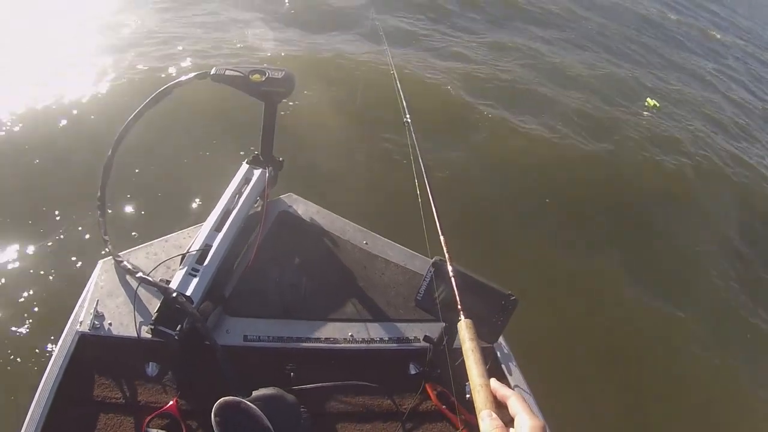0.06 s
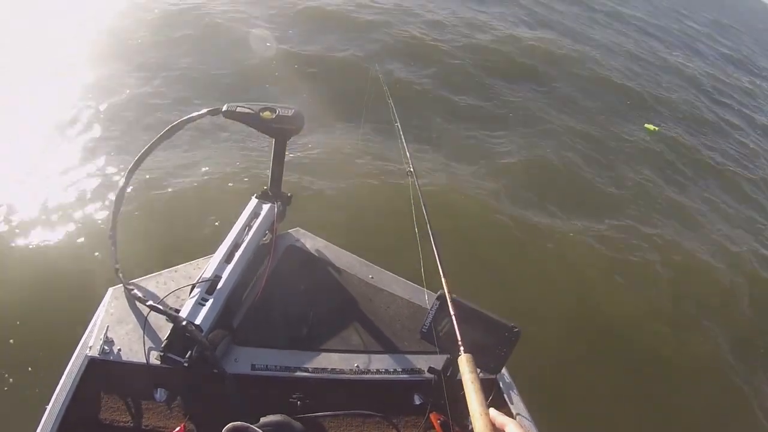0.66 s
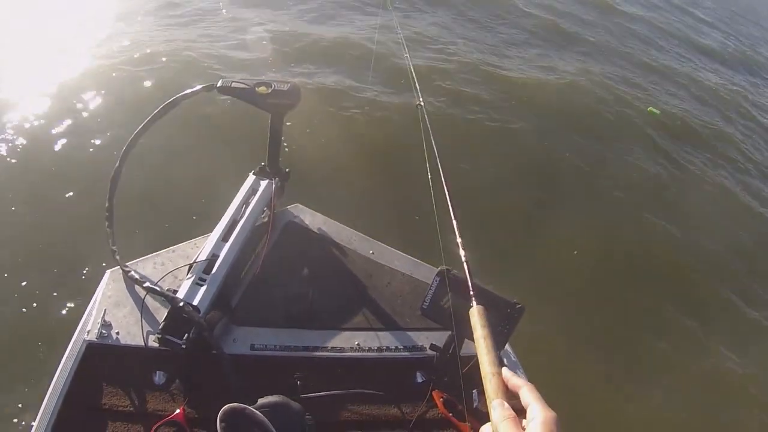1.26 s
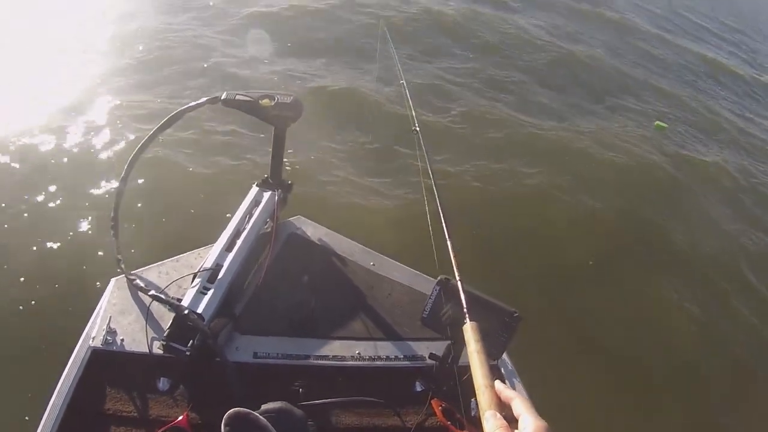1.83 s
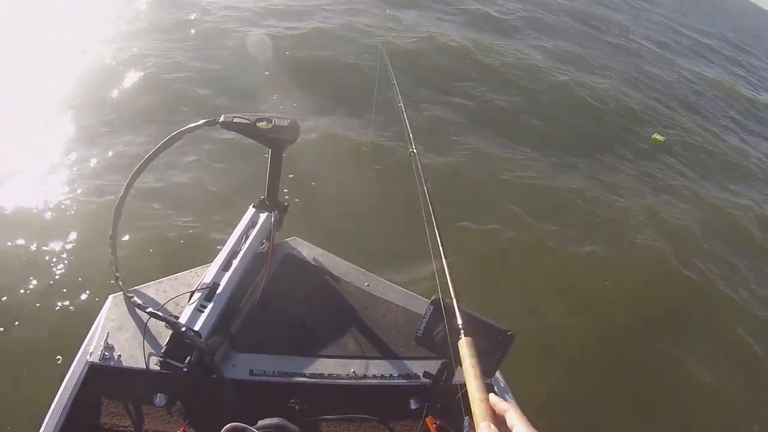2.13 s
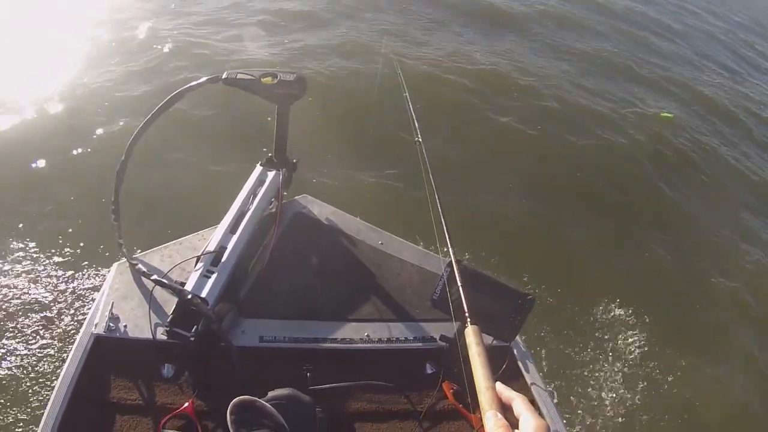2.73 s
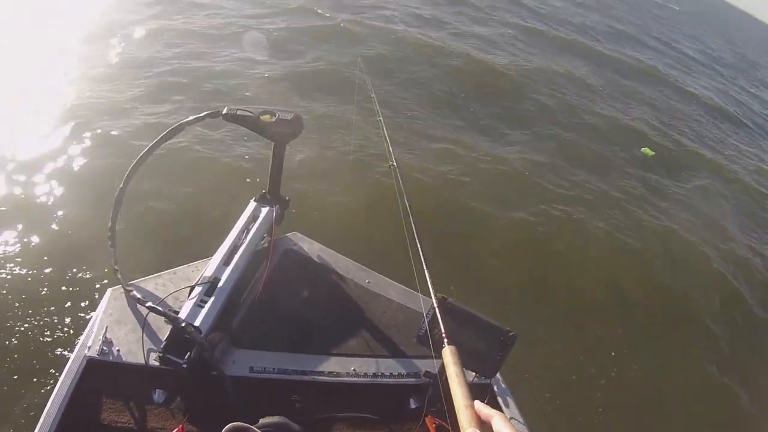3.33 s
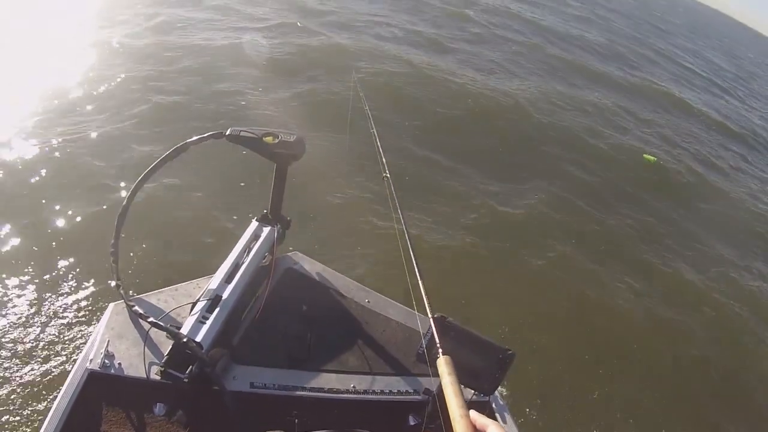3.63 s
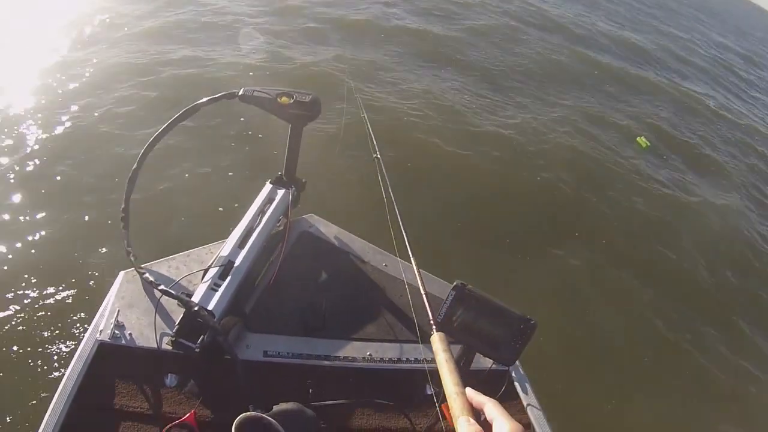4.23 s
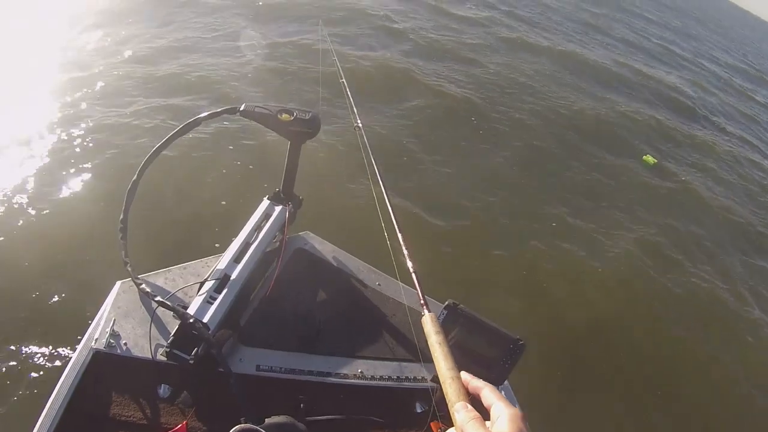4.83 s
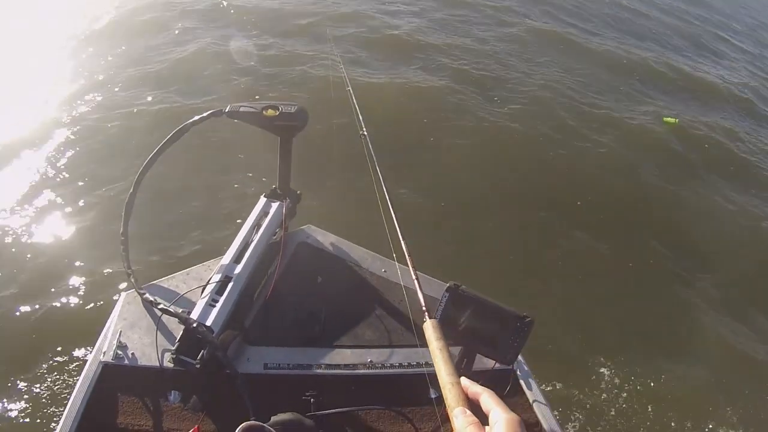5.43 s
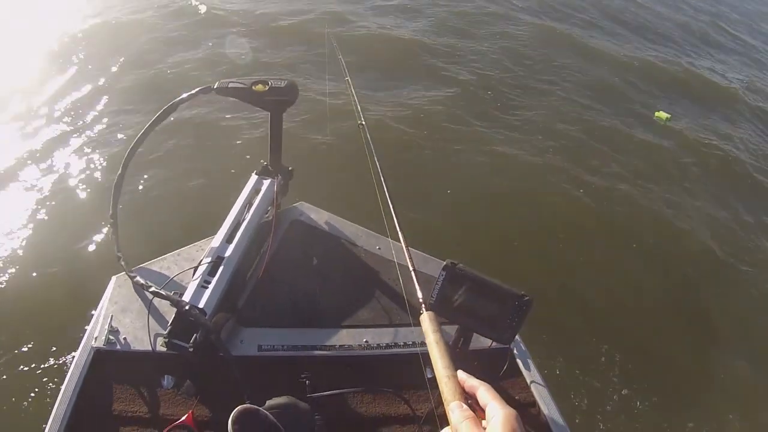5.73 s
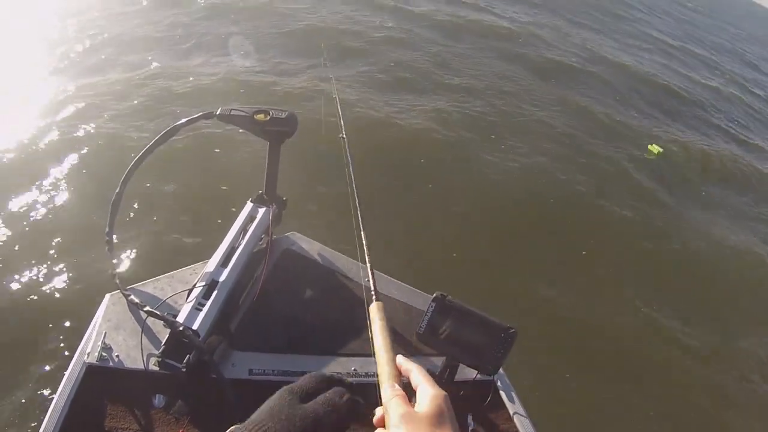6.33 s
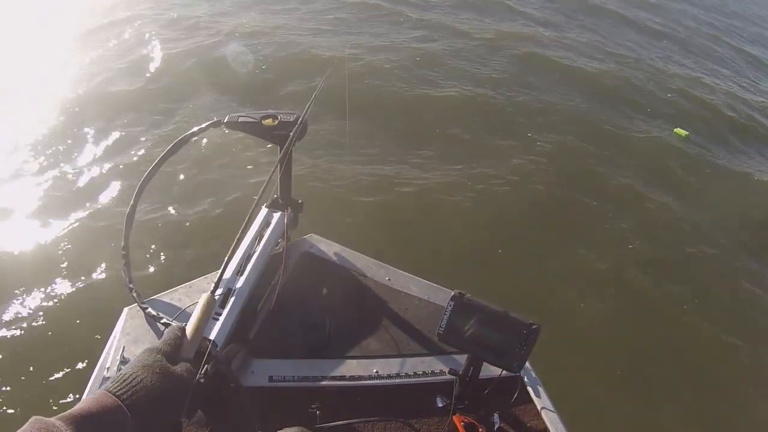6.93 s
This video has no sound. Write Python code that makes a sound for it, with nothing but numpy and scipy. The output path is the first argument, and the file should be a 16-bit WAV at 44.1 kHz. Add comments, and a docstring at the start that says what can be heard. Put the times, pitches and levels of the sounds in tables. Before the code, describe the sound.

Uneven, low wind buffets a body-worn microphone throughout, over a soft wash of ripples on an open lake. Water plops close by against a small boat's bow, with a brief gurgle near 0.9 seconds. At about 2.1 seconds a wave hits with a sharp slap, dull hull thumps and bubbling, and bright spray spatters back until about 3 seconds. Another wave thumps and gurgles at 3.2 seconds, breaking into a longer splash around 3.5 that trickles off in droplets and faint fizzing foam. At 4.8 seconds fishing tackle gives one hard clack. A third wave gurgles right after, with a splash and a low thump around 5.3 seconds. Smaller plops and dashes of water follow near 5.9, 6.2 and 6.7 seconds, while the wind blows a little harder, in short puffs, up to the end at about 7 seconds.

```python
"""Small fishing boat on a choppy lake

Waves hit the bow: trapped air slaps and gurgles, crests splash, spray rains back and water trickles off.
Between them ripples lap and plop, drops spatter, and the fishing tackle clacks once.
Most of the water sound is ringing bubbles and drops: big ones sound low, small ones high.
Swirls of wind buffet the microphone of a body-worn camera, whose housing colours everything."""
import sys
import numpy as np
from scipy import signal
from scipy.fft import rfft, irfft
from scipy.io import wavfile
from scipy.ndimage import uniform_filter1d

SR = 44100
rng = np.random.default_rng(int(sys.argv[2]) if len(sys.argv) > 2 else 0)


def inscribe(sig):
    """Save sig as 16-bit PCM at rate SR to the path in sys.argv[1].

    A 1-D sig is mono; a 2-D sig holds one channel per row.
    Samples are clipped to [-1, 1] before scaling.
    """
    pcm = np.round(np.clip(np.atleast_2d(sig).T, -1, 1) * 32767)
    wavfile.write(sys.argv[1], SR, pcm.astype(np.int16))


N = 316197

# Waves hitting the bow. Each row: time of full strength in seconds, level in dB,
# hold and fade in seconds, extra spray in dB.
WAVE_HITS = [(0.805, -52, 0.11, 0.042, -0.5), (2.135, -40.5, 0.1, 0.13, 3.5),
             (3.173, -40, 0.055, 0.34, 1.5), (4.894, -41.5, 0.062, 0.71, -2.5)]
# Crests falling back on the lake. Each row: time of full strength in seconds, level in dB,
# rise, hold and fade in seconds, extra spray in dB.
CRESTS = [(2.38, -49.5, 0.099, 0.24, 0.16, 7.3), (2.682, -50, 0.08, 0.11, 0.18, 9),
          (3.448, -43.5, 0.26, 0.12, 0.54, -1), (5.237, -43, 0.24, 0.085, 0.2, 0),
          (6.133, -61.5, 0.23, 0.18, 0.084, -2.5), (6.613, -55.5, 0.37, .06, 0.38, -4)]
# The balance of a hit, a crest and its foam. Each lists gurgle, splash, spray and mist in dB.
HIT_MIX = [-1, -9, -19, -26.5]
CREST_MIX = [-4, 0.5, -7, -13.5]
FOAM_MIX = [-44, -37, -24, -26.5]
# Bubbles and drops, from biggest to finest. Each row: pitch in Hz, level in dB.
GURGLE_PITCHES = [(500, -20), (750, -7), (1100, -2.5), (1400, -6.5), (1800, -8.5)]
SPLASH_PITCHES = [(1500, -2), (2300, -3.5), (3600, -5.5), (4800, -12)]
SPRAY_PITCHES = [(5000, -5.5), (5900, -6), (7600, -5), (8800, -11.5)]
MIST_PITCHES = [(9000, 4), (11700, 4), (13200, -19), (14500, -14)]

def waves():
    """Waves fold in large bubbles, break into small ones, throw spray and mist, and leave foam."""
    surges = []
    for s, db, hold_s, fade_s, spray_db in WAVE_HITS:
        surges.append(surge(HIT_MIX, s, db, 0.062, hold_s, fade_s, spray_db))   # a quick rise
    for s, db, rise_s, hold_s, fade_s, spray_db in CRESTS:
        surges.append(surge(CREST_MIX, s, db, rise_s, hold_s, fade_s, spray_db))
        surges.append(surge(FOAM_MIX, s, db, rise_s, hold_s, fade_s=2.8, spray_db=0))
    gurgle, splash, spray, mist = np.sqrt(sum(gains ** 2 for gains in surges))   # their energies add
    large = bubbles(GURGLE_PITCHES, per_s=750, cycles=11, spread_db=2.6, clump_db=1.5, pitches=24)
    small = bubbles(SPLASH_PITCHES, per_s=3600, cycles=11, spread_db=2.4, clump_db=1.3, pitches=20)
    drops = bubbles(SPRAY_PITCHES, per_s=3600, cycles=10, spread_db=2.6, clump_db=1.4, pitches=14)
    droplets = bubbles(MIST_PITCHES, per_s=4400, cycles=4.4, spread_db=2.5, clump_db=2.0, pitches=12)
    sheets = from_db(0.9 * drift(14))   # spray lands in sheets
    return gurgle * large + splash * small + sheets * (spray * drops + mist * droplets)


# How long each part of a wave lingers: the share of the fade time for gurgle, splash, spray and mist.
FADE_SHARES = [0.57, 0.91, 0.66, 0.65]

def surge(mix, s, db, rise_s, hold_s, fade_s, spray_db):
    """One rush of water, as four loudness curves: gurgle, splash, spray and mist."""
    extras_db = [0, 0, spray_db, 0.52 * spray_db]   # more spray brings more mist
    return np.array([from_db(db + part_db + extra_db) * swell(s, rise_s, hold_s, fade_s * share)
                     for part_db, extra_db, share in zip(mix, extras_db, FADE_SHARES)])


# Air pockets closing at the hull. Each row: start in seconds, level in dB, pitch in Hz,
# ring time in seconds, level of the churn around it in dB relative to the plop.
PLOPS = [(.48, -46, 1300, .05, -2), (.518, -41, 770, .05, 3), (.549, -44, 1000, .05, 6),
         (.59, -48.5, 2710, .06, 9), (.816, -42, 1390, .07, 2), (.845, -50, 2130, .06, -6),
         (.863, -30.5, 950, 0.049, -14), (.878, -37, 857, 0.052, -4), (0.902, -41.5, 1470, 0.064, 3),
         (1.271, -40, 1800, 0.042, 1), (1.759, -41, 1300, 0.054, -4), (2.147, -28, 1020, 0.063, -8),
         (2.174, -39, 1730, .04, 4), (2.187, -33, 1440, .025, -3), (2.208, -29.5, 1106, .05, 3.5),
         (2.221, -34.5, 1300, 0.045, 3), (2.236, -42, 1480, .05, 5), (2.256, -40, 1250, 0.094, -6),
         (2.328, -39.5, 1350, .04, 5), (2.357, -37.5, 2020, .05, 7), (2.535, -42.5, 1390, .06, -5),
         (3.019, -43, 1230, .05, 5), (3.168, -40, 1520, .04, -4), (3.18, -36.5, 820, 0.046, 4),
         (3.2, -38.5, 1530, .03, 6), (3.22, -35, 1090, .04, 1), (3.292, -41, 1280, 0.077, 9),
         (3.478, -35.5, 1260, 0.078, -11), (3.568, -37, 760, .07, 10.5), (3.623, -38, 1100, .04, -1.5),
         (3.696, -38, 1140, .09, 4), (3.726, -45, 2330, .05, -3), (3.802, -42, 1290, .05, 5.5),
         (3.843, -46, 1510, 0.044, 1), (4.004, -44.5, 1090, .04, 5), (4.824, -39, 1660, .05, -3),
         (4.917, -35, 1250, .05, 6), (4.94, -35, 1130, .06, 5), (5.378, -35, 1760, 0.037, -4),
         (5.877, -30.5, 1500, 0.02, -2), (5.926, -39.5, 1200, 0.053, 7), (5.964, -43, 1950, 0.074, -8),
         (5.994, -32.5, 847, .06, -3), (6.019, -42, 835, .05, -6), (6.223, -36, 986, 0.061, -4),
         (6.678, -35.5, 1232, 0.07, 1)]

def plops():
    """Single pockets of air ring as the water churns shut over them."""
    out = np.zeros(N)
    for s, db, hz, ring_s, churn_db in PLOPS:
        add(out, s, from_db(db) * air_pocket(hz, ring_s, swell_s=0.00074, glide=-0.035))
        add(out, s, from_db(db + churn_db) * churn(hz))
    return out


def churn(hz):
    """Water closing over an air pocket tears off a quick run of six smaller and larger bubbles."""
    span_s, span_octaves, cycles = 0.016, 0.96, 13
    out = np.zeros(SR // 2)
    for delay, height, strength in rng.random((6, 3)):
        bubble_hz = hz * 2 ** (span_octaves * (height - 0.5))
        bubble = air_pocket(bubble_hz, ring_s=cycles / bubble_hz, swell_s=1 / bubble_hz)
        add(out, delay * span_s, from_db(-7) * (0.5 + strength) * bubble)
    return out


# Water slapping under the bow. Each row: start in seconds, level in dB.
SLAPS = [(2.1418, -16.5)]
# The tones of a slap. Each row: pitch in Hz, level in dB, ring time in seconds.
SLAP_TONES = [(1300, 1, 0.0051), (2650, -10, 0.011), (3100, -18, 0.0062), (4900, -23, 0.006),
              (6400, -22.5, 0.0056)]
# The hull taking the weight of a wave. Each row: start in seconds, level in dB, pitch in Hz.
THUMPS = [(2.145, -20, 196), (2.145, -26, 318), (2.212, -14.5, 113), (2.222, -21.5, 151),
          (2.716, -16.5, 118), (3.201, -17, 114), (3.213, -22, 336), (3.565, -22, 210), (5.347, -19, 111),
          (5.927, -25.5, 448)]

def hull():
    """Water strikes the hull with a flat slap of trapped air and with dull thumps."""
    out = np.zeros(N)
    for s, db in SLAPS:
        for hz, tone_db, ring_s in SLAP_TONES:
            add(out, s, from_db(db + tone_db) * air_pocket(hz, ring_s, swell_s=0.0011))
        add(out, s, from_db(db - 19) * crackle(hz=5060, length_s=0.012))   # water squirts out
    for s, db, hz in THUMPS:
        add(out, s, from_db(db) * air_pocket(hz, ring_s=0.05, swell_s=0.0004))
    return out


def air_pocket(hz, ring_s, swell_s, glide=0.0):
    """Squeezed air swells, rings and dies away; glide slides the pitch as the water around it moves."""
    t = np.arange(SR // 5) / SR
    envelope = (1 - np.exp(-(t / swell_s) ** 2)) * np.exp(-np.log(1000) * t / ring_s)
    pitch_hz = hz * (1 + glide * np.minimum(t / ring_s, 2))
    return envelope / envelope.max() * np.sin(2 * np.pi * np.cumsum(pitch_hz) / SR)


# Water landing. Each row: start in seconds, level in dB, length in seconds, rough pitch in Hz.
SPATTERS = [(0.042, -46, 0.0055, 8000), (0.324, -46, 0.0072, 8500), (0.532, -42, 0.022, 7460),
            (0.544, -31.5, 0.021, 2330), (1.044, -45, .005, 6000), (1.264, -39, 0.012, 6000),
            (2.24, -41, 0.0064, 13000), (2.34, -37, .006, 7500), (2.37, -44, 0.025, 9000),
            (2.39, -35, .006, 12000), (2.463, -29.5, 0.023, 6000), (2.518, -31, .006, 6800),
            (2.575, -32, .01, 7500), (2.599, -33, .008, 8800), (2.657, -39, .006, 8800),
            (2.762, -27, 0.0043, 6800), (2.848, -34, .005, 6200), (2.896, -39, 0.0081, 11000),
            (3.019, -45, .008, 8000), (3.193, -40, 0.099, 6500), (3.45, -28, 0.012, 3600),
            (4.714, -44.5, 0.031, 6500), (5.191, -37, 0.029, 8050), (5.343, -29, .01, 3800),
            (5.35, -31, 0.01, 8100), (5.887, -44, 0.014, 8500), (5.888, -34, 0.03, 2500),
            (5.928, -37, 0.016, 6500), (6.118, -44, .006, 7000), (6.207, -48, .006, 9000),
            (6.318, -45, 0.0055, 9000), (6.688, -36, 0.035, 2200)]

def spatters():
    """Small dashes of water and big drops fall back, each with a short crackle."""
    out = np.zeros(N)
    for s, db, length_s, hz in SPATTERS:
        add(out, s, from_db(db) * crackle(hz, length_s))
    return out


def crackle(hz, length_s):
    """A quick burst of noise, as from a small sheet of water tearing."""
    t = np.arange(SR // 4) / SR
    envelope = np.exp(-3 * t / length_s)
    band = signal.butter(2, [hz * 0.3, min(hz * 1.12, SR / 2.2)], "band", fs=SR, output="sos")
    burst = rng.standard_normal(len(t)) * envelope
    burst = signal.sosfilt(band, signal.sosfilt(band, burst))
    return 0.43 * burst * np.linalg.norm(envelope) / np.linalg.norm(burst)


# Droplets running off the bow. Each row: pitch in Hz, level in dB.
TRICKLE_PITCHES = [(950, -9), (1250, -3), (1800, 3), (2800, -3)]

def trickle():
    """The heaviest wave drains off the bow in separate, clearly pitched droplets."""
    droplets = bubbles(TRICKLE_PITCHES, per_s=130, cycles=26, spread_db=2.5, clump_db=1.5, pitches=14)
    return from_db(-52) * swell(3.5, rise_s=0.6, hold_s=-0.02, fade_s=0.33) * droplets


# The fishing tackle knocking. Each row: start in seconds, level in dB.
TACKLE_KNOCKS = [(4.7877, -20), (4.7905, -22.5)]
# The tones of the tackle. Each row: pitch in Hz, level in dB, ring time in seconds.
TACKLE_TONES = [(1390, 6, 0.018), (2270, 3.5, 0.012), (3270, 3, 0.018), (4070, -8, 0.01),
                (4950, -3, 0.0083), (6500, -6.5, 0.009), (9800, -21, .008)]

def tackle():
    """Two hard knocks, close enough to make one clack, set a small body chattering and briefly ringing."""
    knocks, chatter = np.zeros(N), np.zeros(N)
    t = np.arange(SR // 20) / SR
    for s, db in TACKLE_KNOCKS:
        burst = rng.standard_normal(len(t)) * np.exp(-t / 0.0037)
        add(knocks, s, from_db([db]))
        add(chatter, s, from_db(db) * burst / np.linalg.norm(burst))
    body = sum((-1) ** k * from_db(db) * ring(knocks + 0.5 * chatter, hz, ring_s)
               for k, (hz, db, ring_s) in enumerate(TACKLE_TONES))
    return from_db(-13) * body + from_db(-10) * chatter


# How loud the wind noise is; it also swells as waves heave the hull near 2.1 and 3.2 s. # Each row: time in
# seconds, level in dB.
WIND_STRENGTH = [(0.0, -35), (0.75, -34), (1.55, -36.5), (2.0, -33), (2.14, -30), (2.4, -37), (2.7, -33),
                 (2.96, -34.5), (3.21, -29), (3.4, -34), (3.6, -30), (3.9, -35.5), (4.78, -28.5),
                 (5.04, -33), (5.34, -28.5), (6.1, -31), (6.45, -27.5), (6.76, -32.5), (7.17, -29)]
# Short puffs of air. Each row: time of full strength in seconds, level in dB.
PUFFS = [(0.69, -37), (5.19, -36), (5.46, -41), (5.68, -37.5), (5.92, -35.5), (6.12, -44), (6.3, -38.5)]
# The tone colour of large swirls, small swirls and puffs. Each row: frequency in Hz, level in dB.
BUFFET_COLOUR = [(18, -10), (28, -1.5), (45, -2), (65, 0.5), (100, -2.5), (150, -5), (220, -10),
                 (400, -33.5)]
RUSH_COLOUR = [(100, -28), (170, 2), (270, 2), (380, -1.5), (520, -6.5), (750, -12.5), (1200, -24),
               (1800, -29.5), (3000, -60), (8000, -82)]
PUFF_COLOUR = [(150, 7.5), (330, 8.5), (480, -3.5), (800, -18)]

def wind():
    """Large swirls of air shake the microphone, small ones rush past, and puffs strike it head on."""
    average_db, buffet_db, rush_db = -32.5, -31, -39
    gust_db = np.interp(np.arange(N) / SR, *np.transpose(WIND_STRENGTH)) - average_db
    buffet = from_db(buffet_db + gust_db + drift(7)) * noise(BUFFET_COLOUR)
    rush = noise(RUSH_COLOUR) * from_db(rush_db + 0.99 * gust_db + 2.02 * drift(31))
    puff_gain = sum(from_db(db) * swell(s, rise_s=0.09, hold_s=0.062, fade_s=0.09) for s, db in PUFFS)
    return buffet + rush + puff_gain * noise(PUFF_COLOUR)


# The tone colour of the open lake. Each row: frequency in Hz, level in dB.
LAKE_COLOUR = [(600, 13.5), (1200, 17), (1900, 6.5), (3500, 6.5), (5500, 0.5), (8000, -7), (12000, -12),
               (15500, -14)]

def ripples():
    """The open lake makes a soft, steady wash with lapping and tiny bursting bubbles in it."""
    fizz = bubbles(SPLASH_PITCHES, per_s=600, cycles=10, spread_db=3.5, clump_db=2.0, pitches=18)
    lapping = bubbles(GURGLE_PITCHES, per_s=120, cycles=52, spread_db=-2.5, clump_db=3.5, pitches=14)
    wash = noise(LAKE_COLOUR) * from_db(1.4 * drift(14))
    return from_db(-58.5) * wash + from_db(-64) * fizz + from_db(-60.5) * lapping


def bubbles(spectrum, per_s, cycles, spread_db, clump_db, pitches):
    """A stream of bubbles or drops of random strength, each ringing briefly at one of many pitches."""
    strengths = from_db(spread_db * np.minimum(rng.exponential(1, N), 4)) * rng.choice([-1, 1], N)
    starts = rng.random(N) < per_s / SR
    clicks = strengths * starts * from_db(clump_db * drift(25))
    pitch_index = rng.integers(0, pitches, N)
    out = np.zeros(N)
    for k, hz in enumerate(np.geomspace(spectrum[0][0], min(spectrum[-1][0], SR / 2.2), pitches)):
        voice = ring(clicks * (pitch_index == k), hz, cycles / hz)
        voice = ring(voice, hz, cycles / hz)   # ringing twice softens the start and clears the pitch
        out += from_db(level_at(spectrum, hz)) * unit_level(voice)
    # the flow shares its energy among the bubbles of each moment, so the level stays even
    energy = np.abs(uniform_filter1d(out ** 2, size=SR // 8))
    return out / np.sqrt(energy + 1e-9)


def ring(clicks, hz, ring_s):
    """Each click starts a pure tone that fades by 60 dB in ring_s."""
    decay, step = np.exp(-np.log(1000) / (ring_s * SR)), 2 * np.pi * hz / SR
    return signal.lfilter([0, np.sin(step)], [1, -2 * decay * np.cos(step), decay ** 2], clicks + 1e-18)


def noise(spectrum):
    """Noise of a given tone colour, falling away steeply below and above it."""
    hz = np.maximum(np.arange(N // 2 + 1) * SR / N, 1)
    low_hz, high_hz = spectrum[0][0], 2 * spectrum[-1][0]
    edges = 1 / np.sqrt((1 + (low_hz / hz) ** 6) * (1 + (hz / high_hz) ** 6))
    colour = from_db(level_at(spectrum, hz)) * edges
    return unit_level(irfft(rfft(rng.standard_normal(N)) * colour, N))


def swell(s, rise_s, hold_s, fade_s):
    """A loudness curve that climbs 20 dB per rise_s until time s, holds, then drops 20 dB per fade_s."""
    t = np.arange(N) / SR - s
    below = np.maximum(-t, 0) / rise_s + np.maximum(t - hold_s, 0) / fade_s
    return from_db(-20 * np.minimum(below, 10))


def drift(rate_hz):
    """A smooth random wobble, typically about 1 in size."""
    hop, warm_up = 40, 2000
    memory = np.exp(-2 * np.pi * rate_hz * hop / SR)
    jitter = rng.standard_normal(N // hop + warm_up + 2)
    slow = signal.lfilter([1], [1, -2 * memory, memory ** 2], jitter)[warm_up:]
    return np.interp(np.arange(N) / hop, np.arange(len(slow)), unit_level(slow))


def level_at(spectrum, hz):
    """Read a level in dB between the rows of a frequency table."""
    known_hz, db = np.transpose(spectrum)
    return np.interp(np.log(hz), np.log(known_hz), db)


def from_db(db):
    """Turn decibels into a multiplier."""
    return 10 ** (np.asarray(db) / 20)


def unit_level(x):
    """Scale a sound to an average (rms) level of 1."""
    return x / np.sqrt(np.mean(x ** 2) + 1e-20)


def add(track, s, sound):
    """Mix a short sound in at s seconds."""
    at = int(np.clip(round(s * SR), 0, N - 1))
    track[at:at + len(sound)] += sound[:N - at]


def scene():
    """Everything as heard from the bow seat, in open air."""
    mix = waves() + plops() + hull() + spatters() + trickle() + tackle() + wind() + ripples()
    fade_in = np.minimum(np.arange(N) / (0.003 * SR), 1)
    fade_out = fade_in[::-1]
    return (mix * fade_in * fade_out)[None]


# Hollows in the camera housing. Each row: frequency in Hz, width in Hz, boost or cut in dB.
HOUSING_HOLLOWS = [(1348, 160, 3.5), (1768, 500, -4.5), (3770, 580, 5), (4070, 4730, -5), (5790, 670, 5.5),
                   (7900, 1100, 3.5), (10100, 1500, -0.5), (11400, 490, 4), (14500, 3300, -5.5)]

def record(dry):
    """The camera housing colours the sound, and the highest treble is cut off."""
    out, cutoff_hz = dry, 15300
    for hz, width_hz, db in HOUSING_HOLLOWS:
        band = signal.lfilter(*signal.iirpeak(hz, hz / width_hz, fs=SR), out)
        out = out + (from_db(db) - 1) * band
    return signal.sosfilt(signal.ellip(10, 0.1, 80, cutoff_hz, fs=SR, output="sos"), out)


dry = scene()
out = record(dry)
inscribe(out)
```